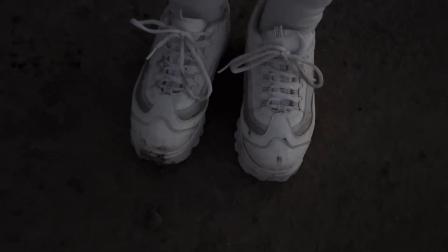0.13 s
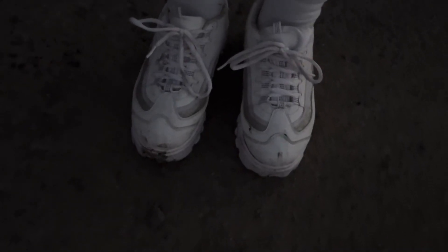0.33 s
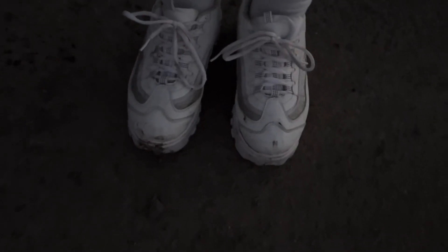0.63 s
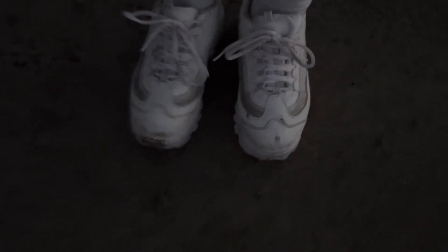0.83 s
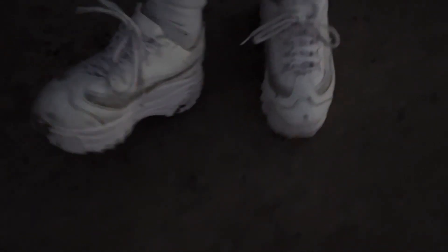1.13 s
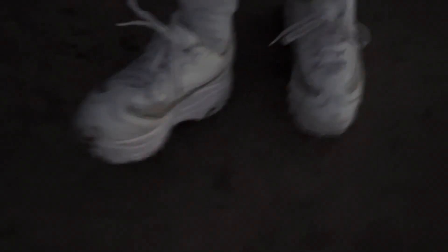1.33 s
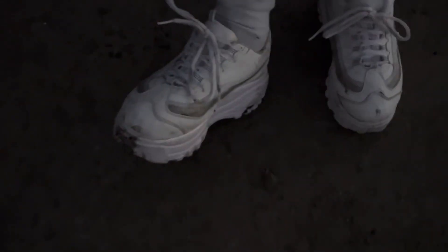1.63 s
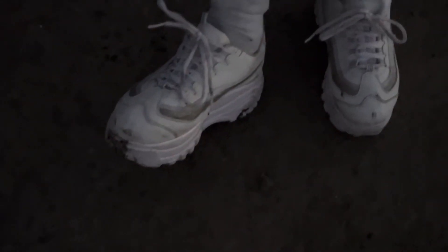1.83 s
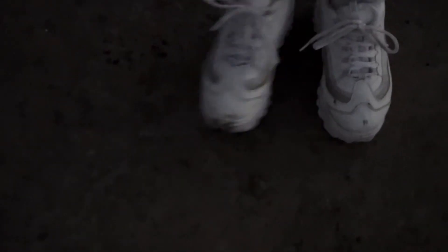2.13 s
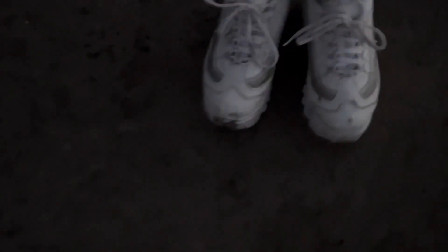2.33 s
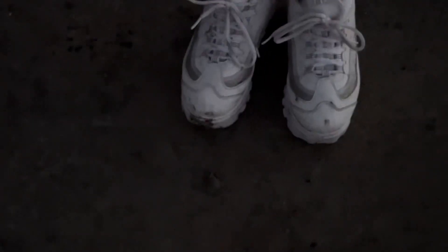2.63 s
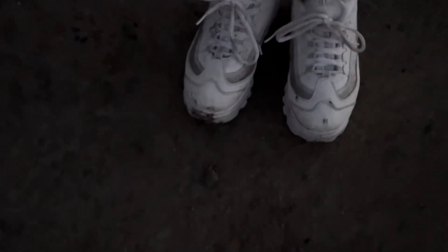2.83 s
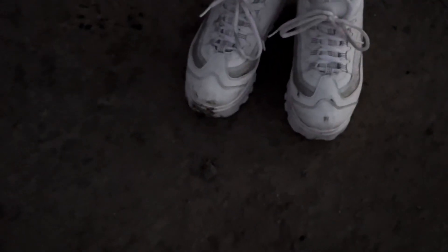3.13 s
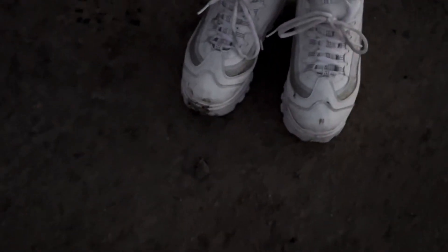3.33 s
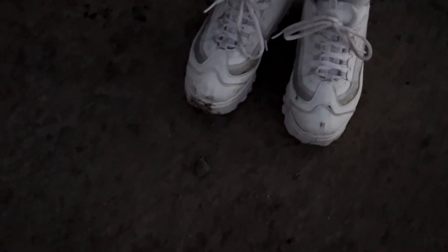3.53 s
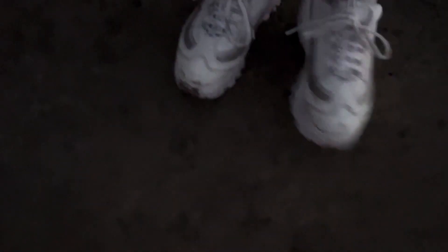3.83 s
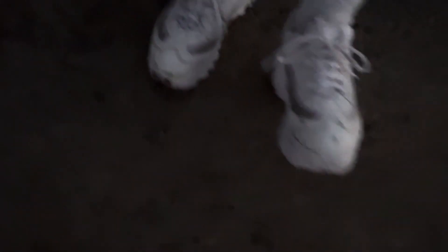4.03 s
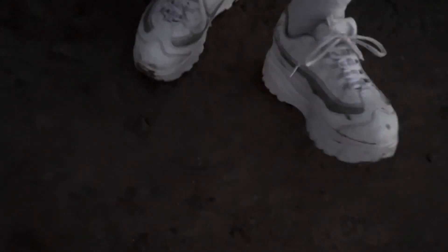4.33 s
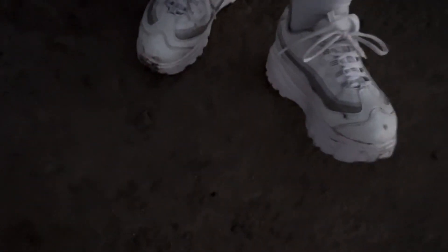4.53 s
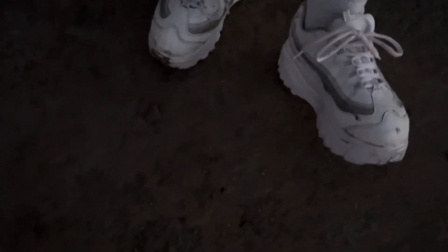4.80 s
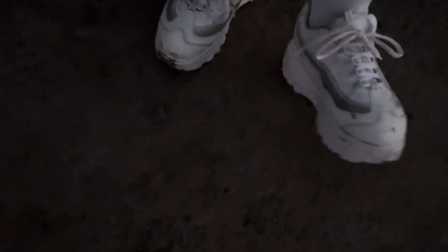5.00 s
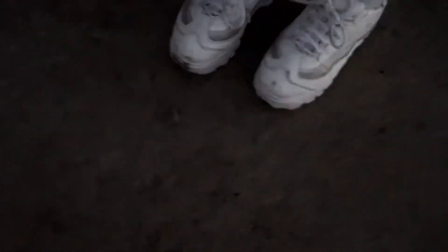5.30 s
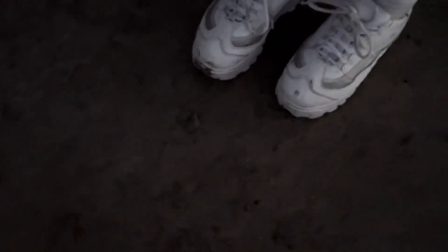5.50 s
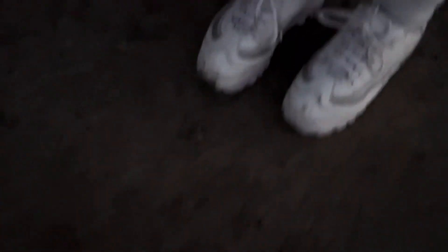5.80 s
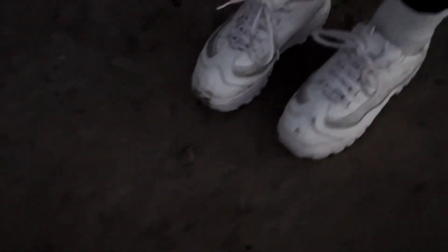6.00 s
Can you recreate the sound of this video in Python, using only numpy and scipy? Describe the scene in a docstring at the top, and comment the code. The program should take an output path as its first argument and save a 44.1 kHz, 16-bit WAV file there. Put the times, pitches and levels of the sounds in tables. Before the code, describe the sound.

A heavy vehicle's low throbbing drone dominates at first, sinking in uneven jumps towards a smooth wash of far traffic. Close in front, rubber soles crunch and scrape on wet grit in bursts, with tiny dry pebble cracks and dull sinking mud pops. Pauses between steps hold only faint grit ticks and a thin dry rustle. Open outdoor place, handheld stereo pickup, little echo.

```python
"""Sneakers shift, scrape and step on damp gritty ground below a hand-held stereo microphone.
The tread rubs as shaped hiss and crushed grains, pebbles snap as short rough rings and cracks,
pockets of mud pop as sinking knocks, and a thin dry rustle is high narrow hiss.
A heavy vehicle, a noise rumble with a wavering note, jumps in level while sinking overall
into the steady wash of far traffic, which is smooth coloured noise."""
import sys
import numpy as np
from scipy import signal
from scipy.fft import rfft, irfft
from scipy.io import wavfile
from scipy.ndimage import uniform_filter1d

SR = 44100
rng = np.random.default_rng(int(sys.argv[2]) if len(sys.argv) > 2 else 0)


def voltage_ratio(level):
    """Linear amplitude factor for a level in decibels (scalar or array-like)."""
    return 10 ** (np.asarray(level, float) / 20)


def transcribe(u):
    """Save the signal u as a 16-bit wav file named by the first command-line argument.

    u: samples, shape (n,) or (channels, n), limited to [-1, 1]; the rate is SR.
    q: integer samples, one column per channel.
    """
    v = np.clip(np.atleast_2d(u).T, -1, 1)
    q = np.round(v * 32767).astype(np.int16)
    wavfile.write(sys.argv[1], SR, q)


N = 271471  # length in samples
STEP_S = 0.0007  # time step of the stroke shapes


def evened(x):
    """Scales a sound to rms 1."""
    return x / np.sqrt(np.mean(x ** 2) + 1e-20)


def read_spectrum(points, hz):
    """Reads values between the points of a spectrum, on a log frequency axis."""
    f, value = np.transpose(points)
    return np.interp(np.log(hz + 1), np.log(f + 1), value)


def curves(rows):
    """Joins the rows by straight lines: one curve per column, one value a sample."""
    s, *columns = np.transpose(rows)
    return [np.interp(np.arange(N) / SR, s, column) for column in columns]


def add(mix, s, sound):
    """Mixes a sound in, starting at s seconds."""
    part = mix[round(s * SR):][:len(sound)]
    part += sound[:len(part)]


def colour(x, points):
    """Filters x by a spectrum in dB, then evens its level."""
    hz = np.fft.rfftfreq(N, 1 / SR)
    return evened(irfft(rfft(x) * voltage_ratio(read_spectrum(points, hz)), N))


def slow_noise(half_width_s):
    """Random wavering: noise smoothed by a bell-shaped window."""
    window = np.hanning(round(2 * half_width_s * SR))
    return evened(signal.oaconvolve(rng.standard_normal(N), window, "same"))


def bump(s, db, rise_s, fall_s):
    """Power of one stroke, one value a step: a rounded rise and fall."""
    # 20 dB down after the rise or fall time; a higher exponent gives a flatter top
    rise_round, fall_round = 1.8, 1.36
    t = np.arange(0, N / SR, STEP_S) - s
    down = np.where(t < 0, (abs(t) / rise_s) ** rise_round, (abs(t) / fall_s) ** fall_round)
    return voltage_ratio(2 * db - 40 * down)  # doubled dB, because this is power


def sampled(steps):
    """Turns one value a step into one value a sample."""
    return np.interp(np.arange(N) / SR, np.arange(len(steps)) * STEP_S, steps)


def traffic():
    """A smooth far wash: noise common to both ears, plus noise of opposite sign in the two ears."""
    # spectrum common to both ears: f/Hz, relative level/dB per Hz
    common_spectrum = [(28, -41), (45, 4.5), (100, 2), (150, -1), (230, -8.5), (330, -13.5), (480, -24),
                       (650, -25), (930, -28), (1300, -29), (1950, -35), (2150, -38), (3600, -48.5),
                       (4500, -63), (8000, -61.5), (9500, -64.5), (11500, -71), (16000, -80)]
    # spectrum of what differs between the ears: f/Hz, relative level/dB per Hz
    wide_spectrum = [(40, -16), (91, 1.5), (262, -5), (400, -13.5), (850, -12.5), (1240, -13.5),
                     (1700, -30.5), (2000, -43), (2200, -55), (3300, -41), (4500, -68), (7400, -71),
                     (7900, -65), (10000, -56), (12200, -60.5), (12800, -68), (16000, -63.5)]
    # balance between the ears: f/Hz, left minus right/dB
    balance = [(60, 2), (130, 0), (290, 3), (640, -1), (1410, -4), (2100, -1), (2500, 0.5), (15000, -0.5)]
    # broad humps in the wash: f/Hz, width/Hz, height/dB
    humps = [(150, 2.2, 3), (545, 84, 9), (775, 146, 8), (1025, 76, 5.5), (1788, 270, 4.5)]
    # the wash swells a little: t/s, level change/dB
    swell = [(0, 1.5), (1, 1.5), (2, 0), (3, 1.5), (3.7, -0.5), (4.5, 0), (5.3, -0.5), (6.16, 0)]
    common_db, wide_db = -46.5, -60  # before the humps, balance and swell
    quarter = 0.54  # power share of the differing noise that is the common noise a quarter cycle off
    common, other = rng.standard_normal((2, N))
    shifted = irfft(1j * rfft(common), N)
    wide = np.sqrt(quarter) * shifted + np.sqrt(1 - quarter) * other
    common = voltage_ratio(common_db) * colour(common, common_spectrum)
    wide = voltage_ratio(wide_db) * colour(wide, wide_spectrum)
    hz = np.fft.rfftfreq(N, 1 / SR)
    humps_db = sum(db / (1 + (2 * (hz - f) / width) ** 2) for f, width, db in humps)
    ear_gain = voltage_ratio(np.outer([0.5, -0.5], read_spectrum(balance, hz)) + humps_db)
    ears = np.array([common + wide, common - wide])
    return voltage_ratio(curves(swell)[0]) * irfft(rfft(ears) * ear_gain, N)


def patchy(x):
    """Far sound drifts in level by patches of time and pitch, alike in both ears."""
    z = signal.stft(x, nperseg=1024)[2]
    patches = rng.standard_normal(z.shape[1:])
    patches = uniform_filter1d(uniform_filter1d(patches, 8, 0), 14, 1)
    return signal.istft(z * voltage_ratio(1.5 * evened(patches)), nperseg=1024)[1][:, :N]  # 1.5 dB rms


def vehicle():
    """Broad throbbing rumble under a narrow wavering exhaust note, both at uneven levels."""
    # colour of the rumble: f/Hz, relative level/dB per Hz
    rumble_spectrum = [(28, -50.5), (40, -11.5), (55, 6.5), (75, 2), (95, -0.5), (115, -18.5), (200, -19.5),
                       (400, -25), (900, -46.5), (2500, -81)]
    # uneven levels, jumping at random while sinking overall: t/s, rumble level/dB, drone level/dB
    levels = [(0.0, -34, -30.5), (0.05, -33.5, -32), (1.2, -36, -34.5), (1.25, -46.5, -34.5),
              (1.32, -33, -37.5), (1.54, -41.5, -46.5), (1.64, -35.5, -35.5), (2.28, -43.5, -49),
              (3.67, -46.5, -48), (3.7, -61, -57), (3.98, -44, -53.5), (4.82, -52, -43.5), (4.92, -51, -59),
              (4.97, -39.5, -51.5), (5.31, -53, -50.5), (5.37, -43, -63), (5.5, -49, -45),
              (6.16, -50, -46.5)]
    drone_hz, smoother_hz = 86.1, 2.7  # the second sets how fast the note wavers
    steady = 1.4  # a steady note beside the random part of rms 1
    throb_db, throb_s = 2.5, 0.05  # random wavering of the rumble: rms depth, half its window
    rumble_db, drone_db = curves(levels)
    a, b, c = rng.standard_normal((3, N))
    r = np.exp(-np.pi * smoother_hz / SR)
    waver = signal.lfilter([1], [1, -2 * r, r * r], a + 1j * b)
    waver = waver / np.sqrt(np.mean(abs(waver) ** 2)) + steady
    drone = evened((waver * np.exp(2j * np.pi * drone_hz * np.arange(N) / SR)).real)
    throb = evened(voltage_ratio(throb_db * slow_noise(throb_s)))
    rumble = throb * voltage_ratio(rumble_db) * colour(c, rumble_spectrum)
    both = rumble + voltage_ratio(drone_db) * drone
    return both * voltage_ratio([[0.25], [-0.25]])  # left slightly louder than right


def grains():
    """Grit crushed at random moments; each kind of grain rings for a cycle or two at its own pitch."""
    grains_per_s, spread_db = 1300, 3.2
    size = voltage_ratio(spread_db * np.minimum(rng.exponential(1, N), 4))
    size = size * (rng.random(N) < grains_per_s / SR)
    kind = rng.integers(0, 16, N)
    t, out = np.arange(200) / SR, np.zeros(N)
    for k, hz in enumerate(np.geomspace(1200, 15000, 16)):
        grain = np.sin(2 * np.pi * hz * t) * np.exp(-t * (hz + 2500) / 2.5)
        out += signal.oaconvolve(size * (kind == k), hz * grain)[:N]
    spectrum = rfft(out)
    # flattened, so that the grit spectrum alone sets the colour
    smooth_power = uniform_filter1d(abs(spectrum) ** 2, size=4000)
    return evened(irfft(spectrum / np.sqrt(smooth_power + 1e-9), N))


def rubbing():
    """Hiss of the sliding tread mixed with grains of uneven size; the tilt dulls or brightens it."""
    # colour of the grit: f/Hz, relative level/dB per Hz
    grit_spectrum = [(600, -9.5), (1500, -5.5), (2500, -2), (4000, -1.5), (6500, -2), (8500, -1),
                     (10000, 5.5), (12000, -5), (15500, -8), (16500, -47.5)]
    # strokes of the sole on the ground: t of peak/s, peak level/dB, rise/s, fall/s, tilt/dB per octave
    strokes = [(.19, -68.5, 0.85, 0.057, -2), (.52, -79, 0.11, 0.14, -3), (.76, -69, 0.13, 0.11, -6),
               (0.803, -55.5, .02, 0.028, -2.5), (.822, -58.5, 0.026, 0.055, -4),
               (.899, -64, 0.074, 0.079, -3), (.96, -71, 0.12, 0.19, -5), (1.06, -72, .15, 0.31, -3),
               (1.117, -62.5, 0.014, 0.083, -3.5), (1.206, -70.5, 0.047, 0.051, -0.5),
               (1.905, -54.5, 0.014, 0.02, -0.5), (1.94, -72.5, .05, 0.15, -3), (2.17, -77, 0.17, .05, -3),
               (2.213, -48.5, 0.015, 0.017, -3), (2.226, -51, .005, 0.018, -2),
               (2.238, -46.5, 0.0055, 0.0091, -1), (2.219, -55, .012, .02, -8), (2.25, -67, .02, 0.034, -2),
               (2.3, -69, 0.25, 0.22, -4), (2.64, -84.5, 0.13, 0.24, 2), (3.632, -68, 0.06, 0.025, -4.5),
               (3.668, -63.5, 0.069, 0.036, -8), (3.695, -60.5, 0.036, 0.048, -5),
               (3.725, -63.5, 0.019, 0.051, -4.5), (3.8, -70.5, 0.057, 0.21, -3.5),
               (3.885, -67.5, 0.026, 0.054, -6), (4.0, -84, .15, 0.096, 4),
               (4.055, -53.5, 0.0038, 0.011, 9.5), (4.09, -66, 0.082, .12, -5.5),
               (4.2, -54, 0.11, 0.098, -0.2), (4.25, -63.5, 0.098, 0.047, -4), (4.33, -78, .08, 0.093, -2),
               (4.42, -72.5, 0.072, 0.03, -6), (4.47, -75, 0.024, 0.029, -8), (3.35, -78, 0.023, .04, -5),
               (4.615, -90, 0.013, .03, -3), (4.77, -82, 0.027, 0.055, -7), (4.83, -86, .03, .06, -6),
               (4.93, -67, 0.052, 0.12, 0.5), (4.986, -59.5, 0.023, 0.021, 0), (5.04, -82, 0.12, .1, -1),
               (5.142, -68.5, 0.075, 0.061, 0), (5.23, -71.5, 0.079, 0.14, -5.5),
               (5.277, -56.5, 0.011, .015, -4.5), (5.3, -57, 0.029, 0.036, -4.5),
               (5.322, -65.5, .008, 0.063, -3.5), (5.37, -77.5, .05, 0.1, -4.5),
               (5.52, -85, 0.14, 0.16, -2), (5.899, -76.5, 0.13, .15, -3), (6.068, -66, 0.029, 0.21, -5)]
    # faint steady hiss between strokes: level in dB, tilt in dB per octave
    faint_db, faint_tilt_db = -89.5, -2.5
    grain_share = 0.42  # power share of separate grains in quiet rubbing
    merge_db, merge_per_db = -67.5, 3  # above this level the grains crowd into plain hiss
    chatter_db, chatter_s = 1, 0.0049  # the tread grips and lets go: rms depth, half its window
    mottle_db = 2  # wet grit lets go in small patches, each with its own pitch range
    faint = voltage_ratio(2 * faint_db)
    powers = np.array([bump(*row[:4]) for row in strokes])
    power = faint + powers.sum(axis=0)
    tilt_db = (faint * faint_tilt_db + np.transpose(strokes)[4] @ powers) / power
    power, tilt_db = sampled(power), sampled(tilt_db)

    hiss = evened(voltage_ratio(chatter_db * slow_noise(chatter_s)) * rng.standard_normal(N))
    over_db = np.maximum(10 * np.log10(power) - merge_db, 0)
    share = np.clip(grain_share - merge_per_db * over_db, 0, 1)
    drive = colour(np.sqrt(1 - share) * hiss + np.sqrt(share) * grains(), grit_spectrum)

    hz, t, z = signal.stft(drive, SR, nperseg=128)
    octaves = np.log2((hz + 300) / 5500)  # the tilt turns about 5200 Hz
    z = z * voltage_ratio(np.outer(octaves, np.interp(t, np.arange(N) / SR, tilt_db)))
    wet = rng.standard_normal(z.shape)
    wet = uniform_filter1d(uniform_filter1d(wet, size=3, axis=0), size=5, axis=1)
    z = z * evened(voltage_ratio(mottle_db * evened(wet)))
    return np.sqrt(power) * signal.istft(z, SR, nperseg=128)[1][:N]


def snaps():
    """Each pebble gives a broad dry crack, coloured by a very short rough ring, and one fainter echo."""
    # pebbles snapping under the tread: t/s, ring level/dB, ring f/Hz, bright crack over the ring/dB
    pebbles = [(0.6865, -48.5, 5760, -1), (0.7128, -42.5, 7600, -12), (0.7157, -53, 3110, -11),
               (0.7312, -45.5, 4500, -3), (.7322, -43, 2300, -20), (.7412, -42, 5370, -11),
               (.7455, -46, 6710, -5), (0.765, -45, 5030, -3), (.771, -41.5, 6050, -12),
               (.775, -44, 4800, -8), (0.785, -39.5, 4130, -14), (0.803, -46, 5500, -10),
               (0.8146, -40, 6900, 2), (.8152, -44, 4300, -10), (.839, -48, 8500, 3),
               (.8489, -43.5, 3670, -17), (.868, -50, 7150, 3), (0.8994, -36, 3540, -23),
               (0.9197, -47, 3550, -4.5), (.9711, -58, 7330, 3), (.9782, -58, 7300, 1),
               (0.9954, -47, 6500, -5), (.995, -44, 2800, -20), (1.0098, -44.5, 3800, -7),
               (1.0678, -50, 7130, -7), (1.078, -56, 7650, 5), (1.1174, -44, 6500, 4),
               (1.2052, -48, 6800, -5), (1.206, -40, 2700, -20.5), (1.377, -54, 8400, -12),
               (1.49, -57, 3990, -34), (1.91, -36, 5500, -21), (1.9958, -57.5, 3980, 1),
               (2.1947, -59, 4900, 6), (2.214, -33.5, 6150, -9), (2.224, -39, 5140, -11),
               (2.2374, -41.5, 7140, 3), (2.2418, -35, 4170, -8), (2.243, -40, 2600, -20),
               (2.254, -49, 6410, 9), (2.278, -50, 4950, -3), (2.2904, -47.5, 6370, -5),
               (2.3015, -46, 5650, -11), (2.3566, -44.5, 4350, -14), (2.3603, -50.5, 5080, -7),
               (2.3645, -52, 5500, -12), (2.394, -57, 5636, -8), (2.437, -62, 4790, 5),
               (2.5312, -55, 3567, -16), (2.5586, -56, 4570, -6), (2.6271, -58.5, 5380, -8),
               (2.667, -54, 7600, -1), (2.7447, -59, 5240, -22), (3.346, -51.5, 2700, -22),
               (3.3459, -52, 5300, -3), (3.5052, -60, 5200, -20), (3.539, -59, 5000, -15),
               (3.555, -66, 7200, -8), (3.5798, -57, 4720, -7), (3.6003, -52.5, 5300, -7),
               (3.629, -46, 4740, -4), (3.65, -54, 6800, -1), (3.659, -54, 4600, -1),
               (3.671, -43, 4630, -8), (3.688, -50, 5500, -10), (3.7, -45, 6300, -4),
               (3.712, -48, 4600, -8), (3.724, -55, 6400, -3), (3.762, -48, 5600, -10),
               (3.766, -49, 4600, -13), (3.785, -57, 5600, -15), (3.8, -55, 5500, -5),
               (3.8166, -47.5, 5700, -7), (3.8438, -46, 6200, -5), (3.861, -54, 5800, -10),
               (3.866, -54, 6500, -5), (3.879, -55, 4800, 2), (3.887, -53, 5040, -1),
               (3.893, -46.5, 6250, -11), (3.9421, -55, 4670, -8), (3.9989, -58, 4240, -9),
               (4.0173, -58, 5880, -13), (4.043, -42.5, 5400, -23), (4.0423, -45, 3240, -25),
               (4.0545, -34, 3100, -5), (4.0555, -48, 7000, 7), (4.0574, -51, 5070, -1),
               (4.1206, -45, 5210, -11.5), (4.142, -40.5, 6440, -3), (4.195, -40, 6466, -8),
               (4.1976, -40, 5830, -6), (4.228, -38, 6400, -9), (4.244, -42, 4500, -6),
               (4.2637, -46, 4300, -7), (4.3711, -56, 6860, -1), (4.4394, -55, 3660, -15),
               (4.4637, -51, 5350, -4), (4.4742, -54, 5400, -11), (4.611, -51, 5610, -18),
               (4.694, -67, 4700, 9), (4.7598, -51, 5000, -9), (4.7612, -53, 5200, -11),
               (4.818, -59, 4830, -7), (4.832, -63, 4600, -15), (4.858, -63, 4400, -10),
               (4.883, -60, 4800, -9), (4.8926, -42.5, 4630, -6.5), (4.9164, -43, 5460, -11),
               (4.9434, -44, 5530, -1), (4.9505, -38, 5400, -10), (4.967, -53, 7500, 0),
               (5.113, -59, 7000, -8), (5.226, -61, 4900, -15), (5.252, -52, 6800, -8),
               (5.126, -59, 6480, -21), (5.1422, -54, 3000, 7), (5.1445, -47, 7300, -8),
               (5.149, -54, 4700, -5), (5.2032, -52, 5520, -6), (5.2417, -52, 4610, -12),
               (5.2604, -45.5, 6400, -7), (5.32, -43.5, 4230, -5), (5.5138, -54.5, 3180, -11),
               (5.565, -60, 5000, -8), (6.0562, -53, 4160, -3), (6.0709, -49, 4600, 5)]
    ring_t60, crack_t60 = 0.0022, 0.003  # seconds to fall by 60 dB
    rough = 0.4  # random part of the ring
    thud_db = -9.5  # the mud under each pebble adds a duller crack
    echo_db, echo_s = -5, 0.0011  # each snap has one fainter echo off ground or sole within this time
    out, t = np.zeros(N), np.arange(1000) / SR
    high = signal.butter(2, 7000, "high", fs=SR)
    low = signal.butter(1, [1800, 4500], "band", fs=SR)
    rise = 1 - np.exp(-t / 0.000062)
    for s, db, hz, crack_db in pebbles:
        noise = rng.standard_normal((2, len(t)))
        ring = np.sin(2 * np.pi * hz * t) * (1 + rough * noise[0])
        ring = ring * rise * voltage_ratio(-60 * t / ring_t60)
        burst = noise[1] * voltage_ratio(-60 * t / crack_t60)
        bright = voltage_ratio(crack_db) * signal.lfilter(*high, burst)
        thud = voltage_ratio(thud_db) * signal.lfilter(*low, burst)
        snap = voltage_ratio(db) * (ring + bright + thud)
        add(out, s, snap)
        delay = echo_s * (0.3 + 0.7 * abs(np.tanh(noise[0, 0])))
        add(out, s + delay, voltage_ratio(echo_db) * snap)
    return out


def slaps():
    """A hollow knock whose pitch sinks as the pocket of mud opens, over a dull puff."""
    # pockets of mud pop under the sole: t/s, level/dB, final f/Hz, fall by 60 dB/s, pitch fall/Hz
    pockets = [(0.7133, -44, 2950, 0.02, 100), (.795, -47, 2550, .012, 150), (.819, -48, 2280, .015, 400),
               (.828, -55.5, 3060, 0.049, 30), (1.127, -46, 1710, 0.015, 300),
               (1.13, -50.5, 2700, 0.009, 200), (2.206, -46.5, 1306, 0.016, 601),
               (2.21, -37.5, 540, 0.021, 300), (2.211, -45, 2410, 0.023, 300),
               (2.217, -46, 330, 0.024, 200), (2.206, -44, 2100, .012, 300), (2.2175, -46, 2280, .02, 200),
               (2.2235, -43, 1800, 0.0085, 400), (2.239, -40.5, 580, 0.027, 397),
               (2.24, -50, 1600, 0.0039, 600), (2.356, -46, 2000, 0.008, 605),
               (4.054, -45.5, 2410, 0.0062, 400), (4.054, -36, 402, 0.021, 614),
               (4.994, -60, 302, 0.035, 253), (5.1415, -36.5, 482, 0.031, 556),
               (5.275, -32.5, 377, 0.02, 350), (5.321, -39.5, 1900, 0.0069, 700),
               (5.281, -49, 2400, 0.011, 300), (6.06, -45, 1390, .015, 300),
               (6.071, -46.5, 1950, 0.012, 300)]
    rise_s = 0.0008  # for a 1 kHz pop; lower pops rise more slowly
    glide = 0.16  # time of the pitch fall as a share of the 60 dB fall
    puff_db, puff_db_per_octave = -12.5, -1  # the first is for a 1 kHz pop
    out, t = np.zeros(N), np.arange(4000) / SR
    for s, db, hz, t60, fall_hz in pockets:
        turns = np.cumsum(hz + fall_hz * np.exp(-t / (glide * t60))) / SR
        band = signal.butter(2, [0.19 * hz, 1.06 * hz + fall_hz], "band", fs=SR)
        puff = evened(signal.lfilter(*band, rng.standard_normal(len(t))))
        puff_gain = voltage_ratio(puff_db + puff_db_per_octave * np.log2(hz / 1000))
        knock = np.sin(2 * np.pi * turns) + puff_gain * puff
        rise = 1 - np.exp(-(t * hz / 1000 / rise_s) ** 2)
        add(out, s, voltage_ratio(db - 60 * t / max(t60, 0.005)) * rise * knock)  # no fall quicker than 5 ms
    return out


def rustle():
    """Bursts of a thin dry rustle: uneven hiss in a narrow high band."""
    # bursts: t of peak/s, peak level/dB, rise/s, fall/s
    bursts = [(2.551, -79.5, 0.042, .035), (2.64, -83, 0.041, 0.078), (2.87, -75, .015, 0.019),
              (5.725, -78, 0.013, 0.043), (5.797, -75, .015, 0.039), (5.88, -82.5, .15, 0.19)]
    # colour of the rustle: f/Hz, relative level/dB per Hz
    band = [(4500, -28), (6000, -2), (7200, 4.5), (8300, -4), (9500, -25)]
    flutter = voltage_ratio(5.2 * evened(uniform_filter1d(rng.standard_normal(N), size=150)))  # 5.2 dB rms
    power = sampled(sum(bump(*row) for row in bursts))
    return np.sqrt(power) * colour(flutter * rng.standard_normal(N), band)


def scattered(x):
    """Shoes, legs and ground scatter the near sound: a short diffuse tail, partly unlike at each port."""
    scatter_db, scatter_t60 = -14, 0.049  # t60: seconds to fall by 60 dB
    t = np.arange(2000) / SR
    noise = rng.standard_normal((3, len(t)))
    tail = (noise[0] + noise[1:]) * voltage_ratio(-60 * t / scatter_t60) * (t > 0.0006)
    tail = tail / np.linalg.norm(tail[0])
    return voltage_ratio(scatter_db) * signal.oaconvolve(x[None], tail, axes=1)[:, :N]


def ports(x):
    """Sound from below reaches the two microphone ports out of step, mostly in the treble."""
    # how far the left port leads: f/Hz, lead/rad
    port_lead = [(0, 0), (2200, -.1), (3000, -.4), (7300, -.35), (8200, -1.4), (9250, -2.55),
                 (10200, -3.14), (11100, -3.8), (12400, -5.5), (13300, -6.28), (14300, -6.8), (16000, -8.8),
                 (22050, -9)]
    lead = np.interp(np.fft.rfftfreq(N, 1 / SR), *np.transpose(port_lead))
    return irfft(rfft(x) * np.exp(0.5j * np.outer([1, -1], lead)), N)


def scene():
    """Feet close by, traffic and a vehicle behind them."""
    background = patchy(traffic()) + vehicle()
    feet = rubbing() + snaps() + slaps() + rustle()
    return ports(feet + scattered(feet)) + background


def low_pass(x):
    """Removes everything above the highest recorded frequency."""
    return signal.sosfilt(signal.butter(12, 16530, fs=SR, output="sos"), x)


def record(dry):
    """Cuts the treble above about 15.9 kHz and finishes the mix."""
    limited = signal.oaconvolve(dry, signal.firwin(255, 15900, fs=SR)[None], "same")
    return low_pass(limited)


dry = scene()
out = record(dry)
transcribe(out)
```